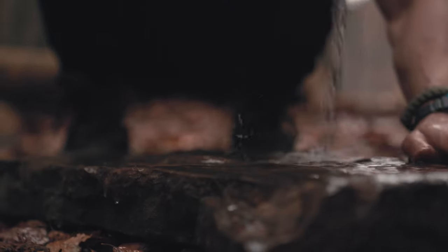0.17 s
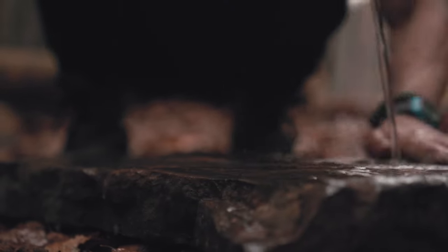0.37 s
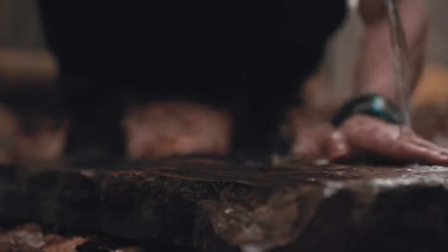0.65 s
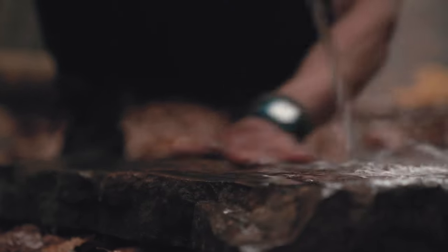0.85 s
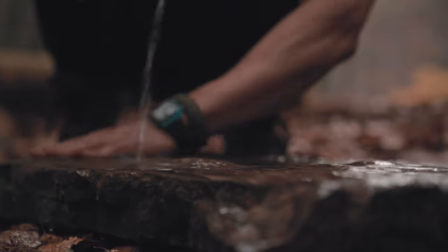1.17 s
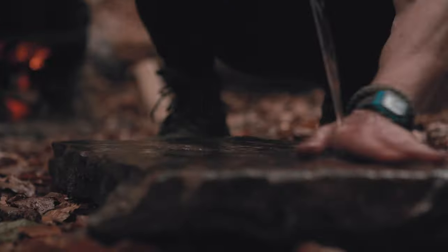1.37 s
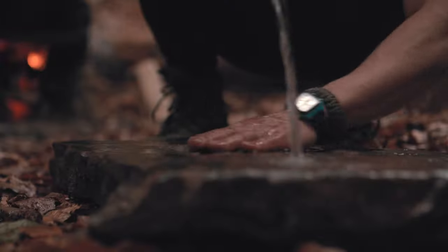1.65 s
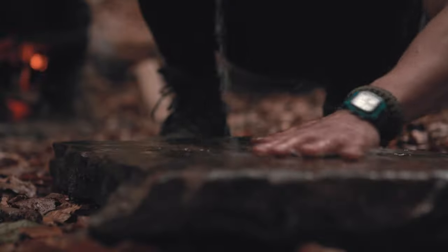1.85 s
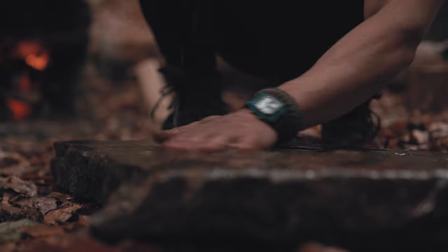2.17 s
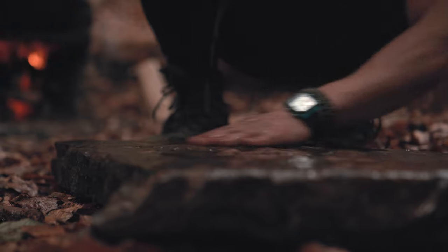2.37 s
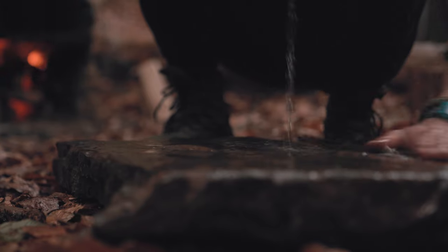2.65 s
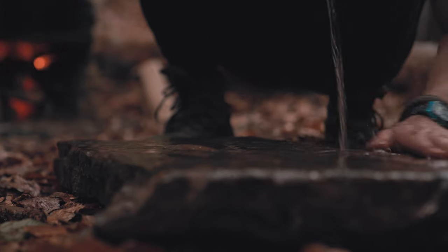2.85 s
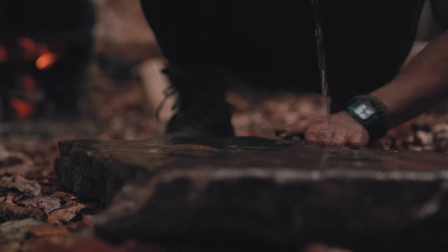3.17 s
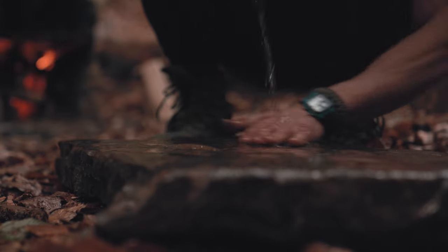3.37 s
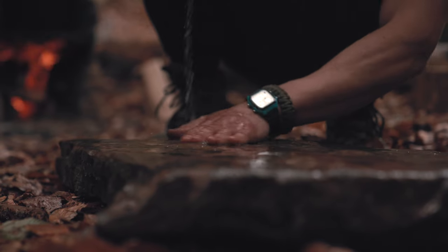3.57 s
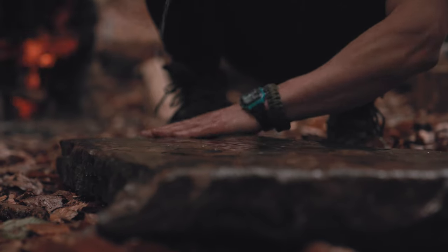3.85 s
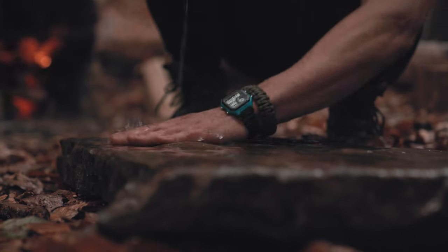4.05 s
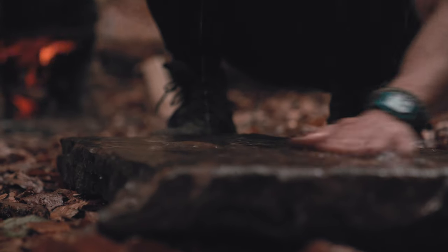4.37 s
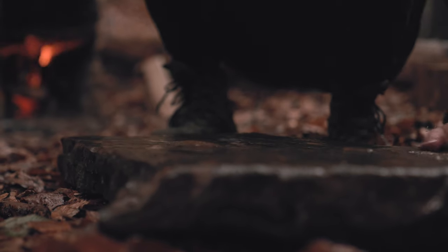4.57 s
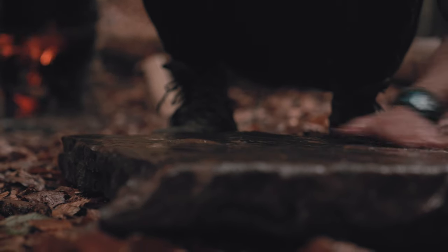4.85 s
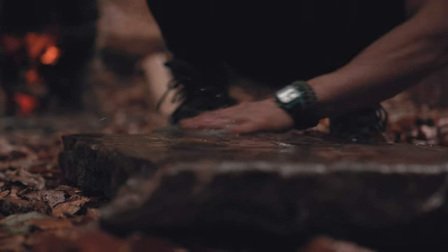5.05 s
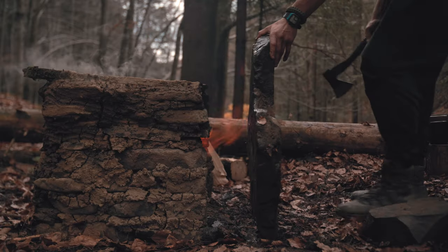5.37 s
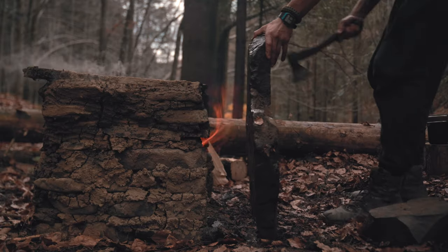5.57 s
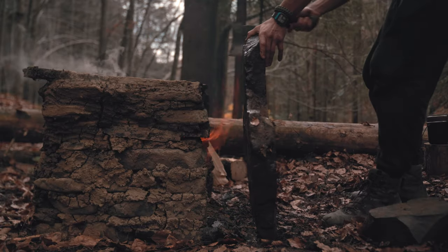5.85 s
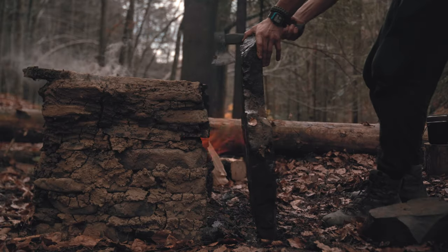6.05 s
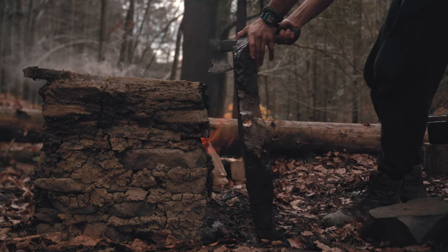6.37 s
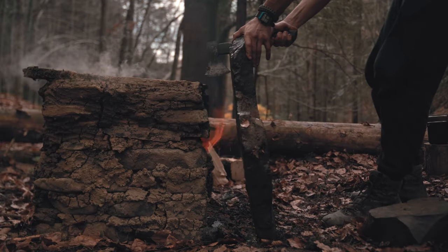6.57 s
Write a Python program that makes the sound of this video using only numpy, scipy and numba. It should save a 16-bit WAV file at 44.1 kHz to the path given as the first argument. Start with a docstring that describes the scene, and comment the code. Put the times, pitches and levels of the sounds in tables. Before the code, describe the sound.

A campfire crackles with sharp pops over a thin stream of water trickling and spattering on stone, with faint forest hiss.

```python
"""In a wood, water is poured on a flat stone and swept about by hand, close to a stereo microphone.
Bubbles ringing in the film of water make it gurgle; droplets spray, tick and splash on the stone.
A camp fire nearby snaps and pops; the ground, the stone and the trees send each pop back.
A soft hiss of flames and air in the trees lies under it all."""
import sys
import numpy as np
from scipy import signal
from scipy.fft import rfft, irfft
from scipy.io import wavfile
from scipy.ndimage import uniform_filter1d
from numba import njit

SR = 44100
rng = np.random.default_rng(int(sys.argv[2]) if len(sys.argv) > 2 else 0)


def to_wav(s):
    """Save 16-bit WAV."""
    ch = np.atleast_2d(s).T  # columns
    pcm = np.round(np.clip(ch, -1, 1) * 32767)  # PCM
    wavfile.write(sys.argv[1], SR, pcm.astype(np.int16))


N = 295911
POP_SAMPLES = 1024


def poured_water():
    """Thousands of bubbles gurgle in the film of water while droplets spray on the stone."""
    # How loud the stream is as it goes: time_s, gurgle_db, spray_db
    stream = [(0, -60.5, -70), (.2, -63.5, -65.5), (.34, -61.5, -60.5), (.55, -60, -62), (.7, -54, -56),
              (.78, -48.5, -59), (.98, -59, -65), (1.1, -58, -72), (1.28, -66, -64), (1.52, -52, -58.5),
              (1.68, -70.5, -73), (1.9, -54, -56), (2.06, -64.5, -72.5), (2.22, -58.5, -64.5),
              (2.46, -65.5, -77), (2.56, -57, -66), (2.73, -61, -64.5), (2.85, -66, -69),
              (3.18, -72, -64.5), (3.32, -58.5, -54), (3.41, -48.5, -56), (3.5, -61.5, -66),
              (3.75, -59, -65.5), (3.9, -63.5, -68), (4.13, -45.5, -66), (4.3, -58.5, -61.5),
              (4.66, -56.5, -66), (4.77, -68.5, -75), (5.0, -51.5, -59), (5.19, -62.5, -68),
              (5.42, -66.5, -73), (5.53, -62, -58), (5.63, -65.5, -76), (6.71, -73, -71)]
    # Pitches of the droplet sizes that the first, thin stream favours: pitch_hz, width_hz, gain_db
    fizz_bands = [(7150, 530, 1.5), (12100, 1100, -2)]
    fizz_ends_s, shift_left_db = 1, 4.5
    t = np.arange(N) / SR
    time_s, *levels = np.transpose(stream)
    gurgle_db, spray_db = (np.interp(t, time_s, db) for db in levels)
    gurgle = swarm(count=14000, lo_hz=1011, hi_hz=5320, cycles=15.2, rise=0.27, spread_db=2, pan_db=9.5)
    spray = swarm(count=40000, lo_hz=5250, hi_hz=14900, cycles=12.6, rise=0.11, spread_db=4.5, pan_db=14)
    early = np.clip((fizz_ends_s - t) / 0.15, 0, 1)
    spray += early * sum(undb(db) * band(spray, hz, width) for hz, width, db in fizz_bands)
    slosh = wander(60)  # both layers surge together as the film breaks
    gurgle *= undb(gurgle_db + 3.23 * slosh)
    spray *= undb(spray_db + 1.8 * slosh + 2.4 * wander(140))
    return (gurgle + spray) * undb([[shift_left_db / 2], [-shift_left_db / 2]])


def swarm(count, lo_hz, hi_hz, cycles, rise, spread_db, pan_db):
    """Tiny bubbles or drops ring at random, many faint and few loud, from the middle to the right."""
    when, pitch, size, place, length = rng.random((count, 5)).T
    hz = lo_hz * (hi_hz / lo_hz) ** pitch
    fade_s = cycles * (.5 + length) / hz
    gain = undb(-spread_db * np.log(1 - .995 * size))
    gain *= np.sqrt(hz)  # short high rings get as much energy as long low ones
    pan = undb(pan_db * (place - 1))
    rings = ring(when * N / SR, hz, fade_s, rise, swell=0.052, left=gain * pan, right=gain / pan)
    return set_level(rings, 0)


def single_bubbles():
    """A few bubbles ring clearly above the stream, each rising a little in pitch."""
    # One bubble a row: start_s, level_db, pitch_hz, fade_s, left_minus_right_db
    bubbles = [(0.607, -34, 2050, 0.014, -9), (0.643, -39, 2700, 0.02, 11), (0.744, -36, 2950, 0.029, 2),
               (0.7554, -43, 1500, 0.022, -3), (0.8046, -44, 1530, 0.036, -2.0),
               (0.84, -42, 1400, 0.046, -1), (0.8586, -39.5, 1560, 0.046, -5),
               (0.9, -42, 3400, 0.018, -1.5), (0.9256, -42, 1530, 0.024, -4),
               (1.092, -34, 1420, 0.0082, 0.0), (1.13, -44, 1800, 0.025, 0), (1.132, -45, 1400, 0.025, 2),
               (1.15, -51, 1280, 0.017, -1), (1.19, -46, 1650, 0.025, 0), (2.57, -42.5, 1800, 0.025, -12),
               (3.3233, -38, 3950, 0.02, 1), (4.0802, -33.5, 3180, 0.02, 6), (4.096, -35.5, 1530, 0.038, 2),
               (4.135, -42, 3120, 0.018, 11), (4.185, -25.5, 1670, 0.008, 0.5),
               (4.369, -49, 1180, 0.02, -4), (4.3947, -41.5, 1530, 0.029, 2),
               (4.6494, -52, 2010, 0.014, -5), (4.981, -39, 3100, 0.02, 8), (5.027, -38, 3100, 0.022, 5),
               (6.096, -42.5, 1500, 0.013, -3)]
    start_s, db, hz, fade_s, pan_db = np.transpose(bubbles)
    left, right = undb(db + pan_db / 2), undb(db - pan_db / 2)
    return ring(start_s, hz, fade_s, rise=0.098, swell=0.041, left=left, right=right)


@njit
def ring(start_s, hz, fade_s, rise, swell, left, right):
    """Bubble tones fade 60 dB in fade_s, swell for a share of that time and climb by the share rise."""
    out = np.zeros((2, N))
    for k in range(len(start_s)):
        length = int(fade_s[k] * SR) + 1
        step = np.exp(2j * np.pi * hz[k] / SR - np.log(1000) / length)  # turns and shrinks the tone
        glide = np.exp(2j * np.pi * hz[k] * rise / SR / length)
        tone, first = 1 + 0j, int(start_s[k] * SR)
        for i in range(first, min(first + length, N)):
            tone *= step
            step *= glide
            sample = tone.imag * min((i - first) / (swell * length), 1.)
            out[0, i] += left[k] * sample
            out[1, i] += right[k] * sample
    return out


def fire_and_splashes():
    """Fire pops, ticks and short splashes: each is two rings, a crack, a sizzle, a knock and a thump."""
    sizzle_hz, knock_hz, thump_hz = 10000, 945, 230
    direct, toward_trees = np.zeros((2, 2, N + POP_SAMPLES))
    t = np.arange(POP_SAMPLES) / SR
    crack_shape = t / 0.00043 * np.exp(1 - t / 0.00045)
    sizzle_shape = t / 0.0012 * np.exp(1 - t / 0.0011)  # the sizzle outlasts the crack
    for start_s, low_hz, low_db, high_hz, high_db, cycles, sizzle_db, knock_db, pan_db in bursts():
        noise = rng.standard_normal((3, POP_SAMPLES))  # left, right, shared
        first = int(start_s * SR)
        here = slice(first, first + POP_SAMPLES)
        knock = undb(knock_db) * wavelet(knock_hz, cycles=1.55)
        thump = undb(knock_db - 14) * wavelet(thump_hz, cycles=2.35, delay_s=0.00076)
        direct[:, here] += knock + thump
        # toward the trees the high ring is a single broad snap
        snap = undb(high_db) * wavelet(high_hz, cycles=0.92)
        toward_trees[:, here] += snap + undb(knock_db) * wavelet(knock_hz, cycles=1.5)
        crack_band = 1.2 * high_hz, 1.06 * high_hz
        # the rings reach the left side a little later than the right
        for side, (delay_s, side_db) in enumerate([(.00005, pan_db), (0, 0)]):
            crack = band(band(0.74 * (noise[side] + noise[2]), *crack_band), *crack_band)
            sizzle = band(band(noise[side], sizzle_hz, 10800), sizzle_hz, 19700)
            pop = undb(low_db) * wavelet(low_hz, 0.88 * cycles, delay_s)
            pop += undb(high_db - 1.5) * crack_shape * crack
            pop += undb(sizzle_db) * sizzle_shape * sizzle
            high_ring = undb(high_db) * wavelet(high_hz, cycles, delay_s)
            direct[side, here] += undb(side_db) * (pop + high_ring)
            toward_trees[side, here] += pop
    return ground_echoes(direct[:, :N]) + tree_echoes(toward_trees[:, :N])


def bursts():
    """List the pops, splashes and ticks together; a tick is a small pop with hardly any knock."""
    # Sharp pops and ticks of the fire, and a few short water splashes:
    # start_s, low_hz, low_db, high_hz, high_db, cycles, sizzle_db, knock_db, left_minus_right_db
    pops_and_splashes = [(0.1687, 1800, -24.5, 5370, -30, 0.9, -37.5, -66, -1),
                         (1.7747, 1460, -71, 3450, -4.5, 1.3, -20.5, -70, -3),
                         (1.8425, 1660, -11.5, 2840, -9.5, 1.4, -20.5, -25.5, 0),
                         (1.9399, 1850, -27.5, 3070, -31, 1.34, -51, -43, -1),
                         (2.5671, 1760, -42, 3230, -34, 2, -40.5, -50.5, -2),
                         (2.8107, 1140, -64, 3480, -30, 1.8, -37.5, -46, 3.5),
                         (2.9259, 1120, -50, 2640, -34, 1.8, -39.5, -50, -4),
                         (3.2945, 1440, -37.5, 3500, -32, 1.8, -35, -74, -5),
                         (3.3706, 2420, -12, 2790, -10, 1.9, -60, -25.5, 2.5),
                         (3.486, 1610, -36.5, 3400, -60, 3.2, -69, -65, -21),
                         (3.704, 1580, -23, 3100, -22, 1.3, -65, -42, -0.5),
                         (3.8702, 1630, -15.5, 2350, -13.5, 1.96, -30.5, -27, 1.5),
                         (3.9161, 2540, -16, 3380, -8, 1.73, -39, -50, 1.5),
                         (4.0673, 2140, -42, 4500, -18, 3.2, -22.5, -38, 7),
                         (4.163, 2370, -21.5, 5460, -23.5, 1.1, -43, -58, -0.5),
                         (4.21, 1640, -32.5, 4530, -33, 1.2, -31, -65, -0.5),
                         (4.3012, 1130, -54, 3340, -12, 2.96, -62, -36.5, 6.5),
                         (4.8916, 2330, -31, 3900, -31, 3.6, -34, -70, -6),
                         (4.9116, 1770, -39, 3250, -29.5, 2.7, -33, -75, -4),
                         (4.9778, 2210, -39, 3100, -47, 4.9, -38.5, -54, -6),
                         (5.515, 480, -39.5, 1680, -36.5, 0.97, -46, -41.5, 0.5),
                         (5.5717, 1240, -30.5, 2540, -25, 1.47, -40.5, -59, 2),
                         (5.5949, 1360, -45, 2530, -35.5, 1.5, -35.5, -58, 1.5),
                         (6.167, 227, -60, 2940, -62, 1.3, -65, -64, -2),
                         (6.2112, 1340, -33, 3500, -29.5, 1.44, -43.5, -73, 1.5),
                         (6.2782, 564, -46, 1240, -46, 1.3, -47.5, -58, -1),
                         (6.312, 870, -53, 2500, -62, 3.5, -60, -68, -1),
                         (6.5686, 2420, -34, 3900, -39.5, 1.7, -46, -52, -1.5),
                         (6.6577, 2170, -34.5, 3950, -26, 1.36, -40.5, -60, -1.5)]
    # Faint, bright ticks of water droplets or fire crackle:
    # start_s, pitch_hz, level_db, sizzle_db, left_minus_right_db
    ticks = [(0.1114, 2850, -48, -43.5, -2), (0.257, 8000, -50, -48, 0), (0.2958, 2920, -59, -33.5, 1),
             (0.3222, 3440, -37.5, -45, 0.5), (0.3789, 3460, -40, -41, -2), (0.464, 9000, -52, -46, -2),
             (0.641, 7400, -45, -43, 0), (1.011, 2820, -47, -41, -0.5), (1.0915, 4500, -42, -44, -4),
             (1.4265, 3170, -43, -45, -1), (1.5218, 3350, -41, -39.5, -1), (1.5528, 5000, -34, -43, -5),
             (1.6387, 4020, -45, -42.5, -1), (2.664, 2920, -45, -52, 0), (2.952, 6370, -36.5, -58, -6),
             (3.198, 2500, -60, -41, -12), (3.213, 5100, -42, -35.5, -6.5), (3.24, 5000, -38, -41, -7),
             (3.331, 3970, -47, -36, -4), (3.344, 6300, -37, -35, -3), (3.351, 3700, -36, -51, 1),
             (3.357, 6500, -42, -44, -5), (3.5271, 2480, -36, -65, -10), (3.7919, 3550, -40, -65, 2.5),
             (3.8292, 3250, -45, -46, 3.5), (4.2573, 3970, -44.5, -46.5, 4), (4.5301, 3270, -38, -39.5, -2),
             (4.66, 4000, -48, -38.5, 0), (4.809, 4160, -43, -50, -2), (5.0195, 3150, -42, -44.5, -3),
             (5.064, 4630, -39, -45.5, 2), (5.1113, 4570, -42.5, -53, 4), (5.6822, 3400, -47, -47, 0),
             (5.83, 3670, -50, -37.5, -2), (5.8605, 3150, -49, -45, 0), (5.9385, 3650, -43, -35.5, 0.5)]
    return pops_and_splashes + [(start_s, 0.54 * hz, db - 9.5, hz, db, 3.2, sizzle_db, db - 25.5, pan_db)
                                for start_s, hz, db, sizzle_db, pan_db in ticks]


def wavelet(hz, cycles, delay_s=0):
    """A ring of a few cycles that swells fast and dies a little slower."""
    turns = np.maximum(np.arange(POP_SAMPLES) / SR - delay_s, 0) * hz
    age = 1.88 * turns / cycles
    return age * np.exp(1 - age) * np.sin(2 * np.pi * turns)


def ground_echoes(sound):
    """The sound arrives directly, then the ground and the stone return single copies."""
    # Early echoes of a pop: delay_s, left_db, right_db
    echoes = [(.0013, -16.5, -23), (.0068, -25, -20.5), (.0115, -26, -17), (0.0181, -32, -22)]
    response = np.zeros((2, 1024))
    response[:, 0] = 1
    for delay_s, left_db, right_db in echoes:
        response[:, int(delay_s * SR)] += undb([left_db, right_db])
    return signal.oaconvolve(sound, response, axes=1)[:, :N]


def tree_echoes(sound):
    """Leaves and trunks send back a noisy tail without deep bass, partly alike left and right."""
    # A short and a long tail, each fading by 60 dB: fade_s, level_db
    tails = [(0.046, -26.5), (.8, -52)]
    t = np.arange(SR // 2) / SR
    noise = rng.standard_normal((3, len(t)))
    fade = sum(undb(db) * 1000. ** (-t / fade_s) for fade_s, db in tails)
    swell = np.minimum(t / 0.00064, 1)
    tail = swell * fade * (0.72 * noise[:2] + 0.68 * noise[2])
    tail = signal.lfilter(*signal.butter(1, 400, "high", fs=SR), tail)
    return signal.oaconvolve(sound, tail, axes=1)[:, :N]


def hiss():
    """Flames and air in the trees make a smooth noise, alike left and right only in the bass."""
    # Tone colour of the hiss: pitch_hz, relative_db
    colour = [(35, -59), (60, -23.5), (323, -13.5), (380, -12.5), (566, -10), (698, -9), (1280, -5),
              (1470, -2.5), (1660, -0.5), (4030, -3), (5330, -7), (13600, -17.5), (16000, -27)]
    # How alike the two sides are: pitch_hz, likeness (0 to 1)
    likeness = [(100, 1), (350, 0.86), (1000, 0.38), (2800, 0.039), (8000, 0.013)]
    log_pitch = np.log(np.maximum(np.fft.rfftfreq(N, 1 / SR), 1))
    colour_db, alike = (np.interp(log_pitch, np.log(hz), values)
                        for hz, values in (np.transpose(colour), np.transpose(likeness)))
    spectra = rfft(rng.standard_normal((2, N))) * undb(colour_db)
    shared, opposed = spectra * np.sqrt([1 + alike, 1 - alike])
    noise = irfft([shared + opposed, shared - opposed], N)
    return set_level(noise, db=-58) * undb(wander(2.745))


def undb(db):
    """Turn decibels into a number to multiply by."""
    return 10 ** (np.asarray(db) / 20)


def set_level(sound, db):
    """Scale a sound to an average (RMS) level."""
    return sound * undb(db) / np.sqrt(np.mean(sound ** 2))


def band(sound, hz, width_hz):
    """Let through the pitches around hz."""
    return signal.lfilter(*signal.iirpeak(hz, hz / width_hz, fs=SR), sound)


def wander(rate_hz):
    """A smooth random curve that strays about 1 either side of zero."""
    hold = int(SR / rate_hz)
    steps = np.repeat(rng.standard_normal(N // hold + 1), hold)
    return 1.35 * uniform_filter1d(uniform_filter1d(steps, hold), hold)[:N]


def scene():
    """Fire and water sound together over the hiss."""
    return fire_and_splashes() + poured_water() + single_bubbles() + hiss()


def record(dry):
    """The recorder thins the deep bass and cuts the highest treble."""
    bass_hz, top_hz = 125, 15900
    thin = signal.sosfilt(signal.butter(3, bass_hz, "high", fs=SR, output="sos"), dry)
    return signal.sosfilt(signal.ellip(10, .2, 80, top_hz, fs=SR, output="sos"), thin)


dry = scene()
out = record(dry)
to_wav(out)
```